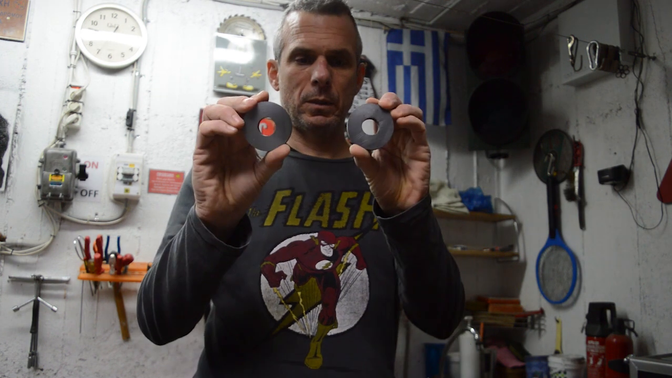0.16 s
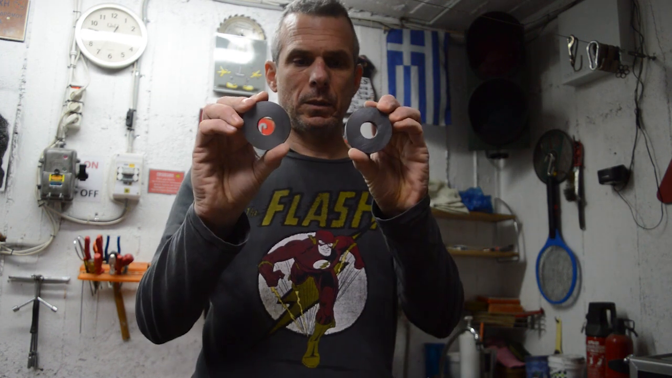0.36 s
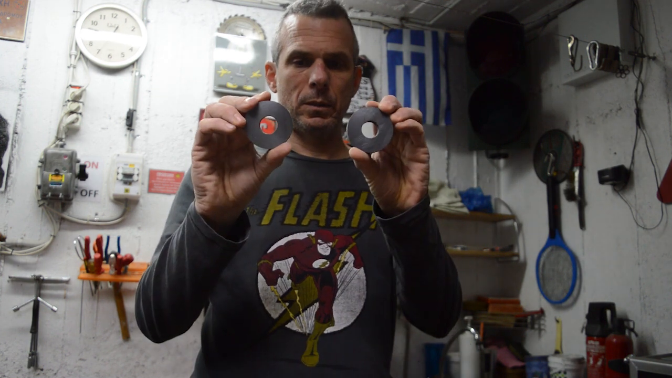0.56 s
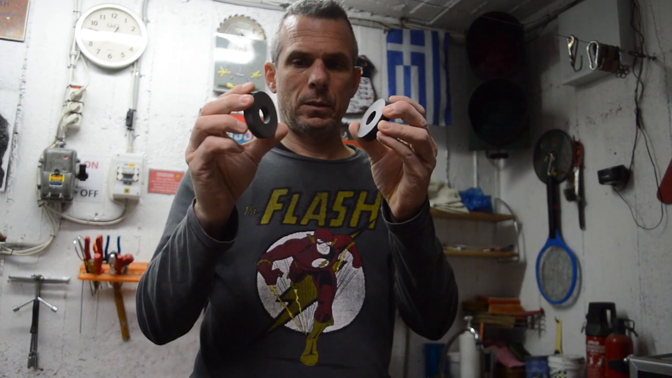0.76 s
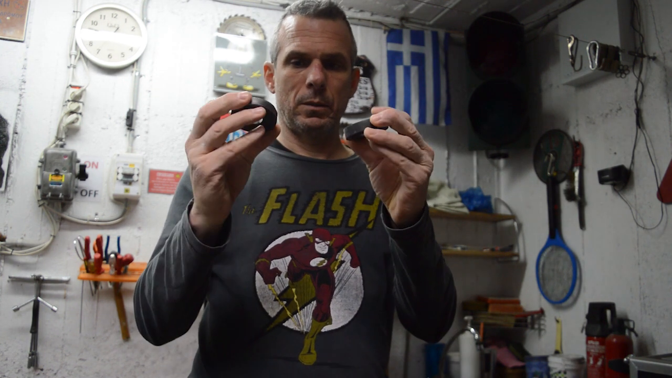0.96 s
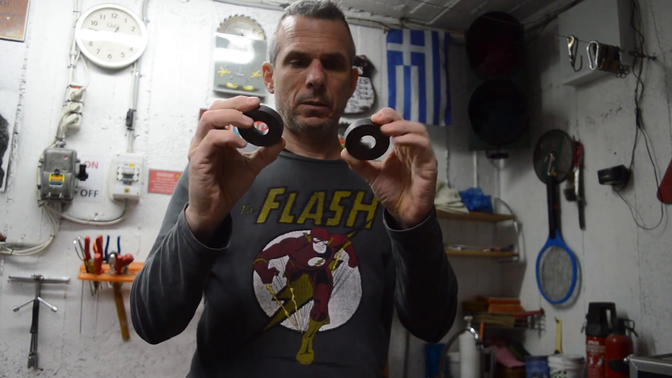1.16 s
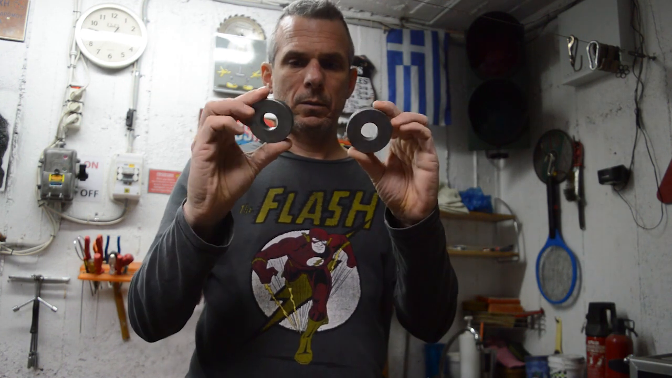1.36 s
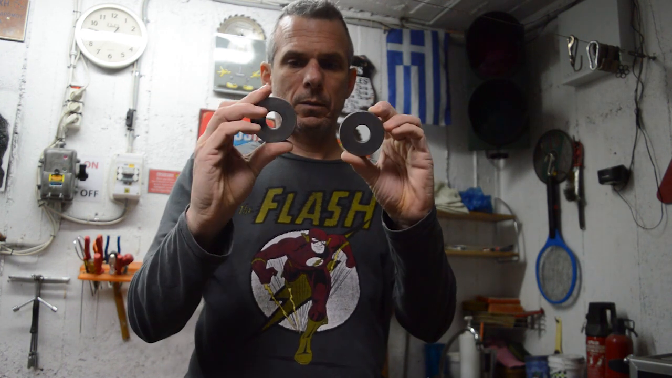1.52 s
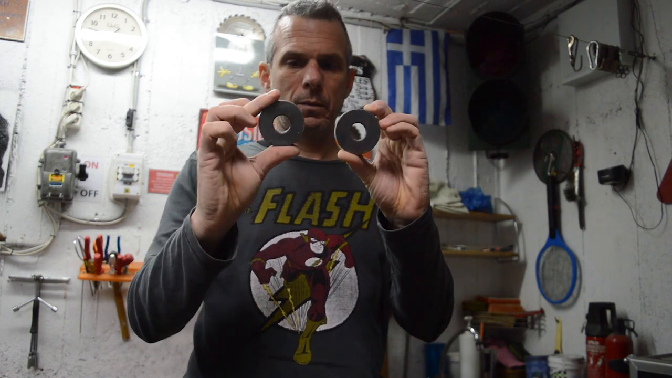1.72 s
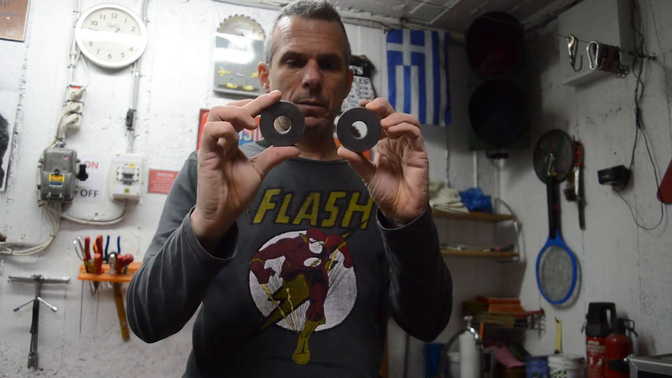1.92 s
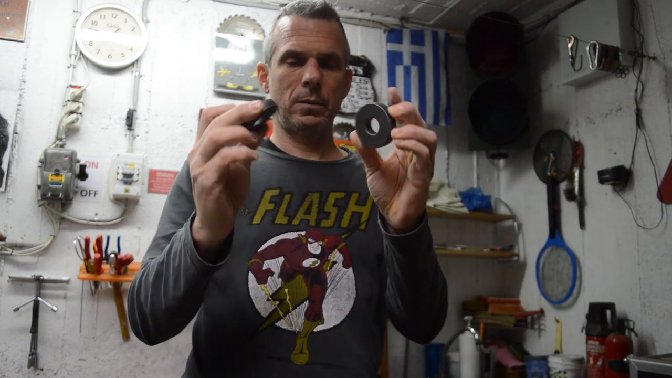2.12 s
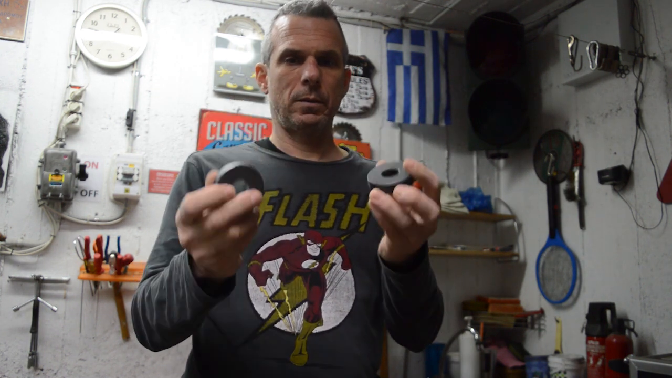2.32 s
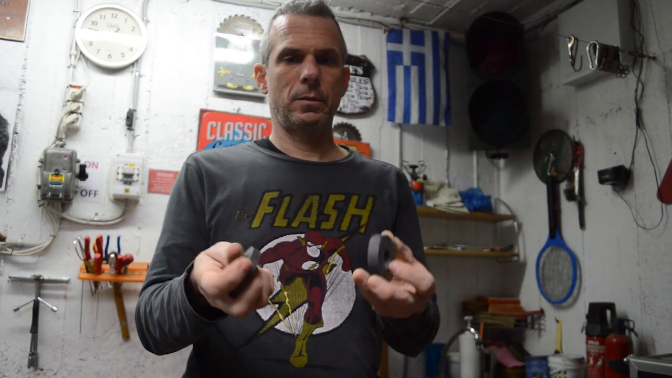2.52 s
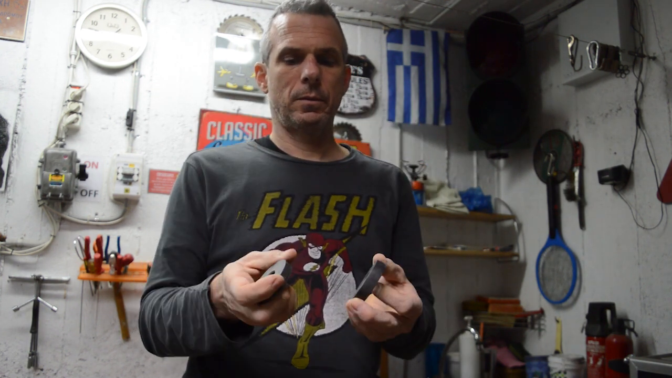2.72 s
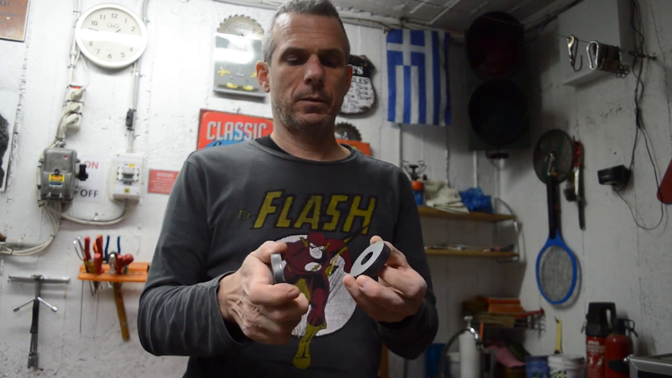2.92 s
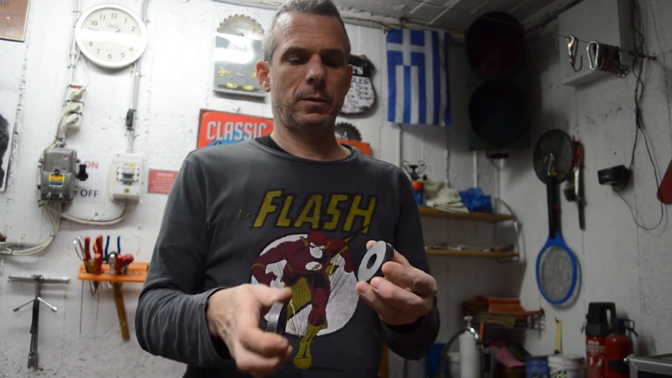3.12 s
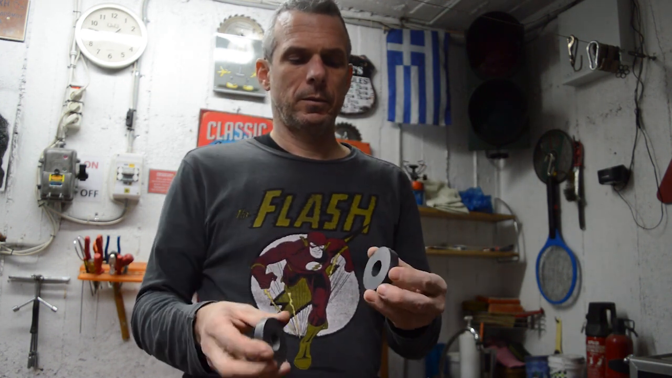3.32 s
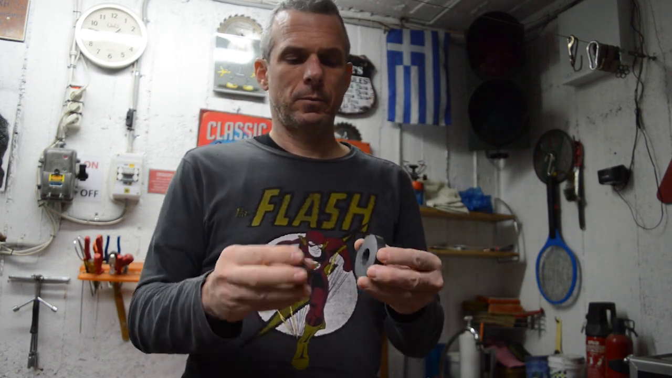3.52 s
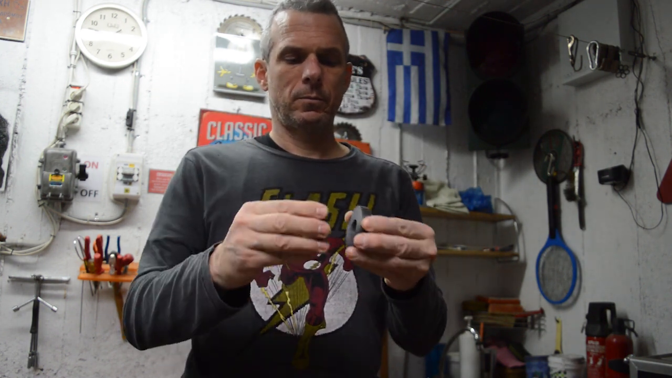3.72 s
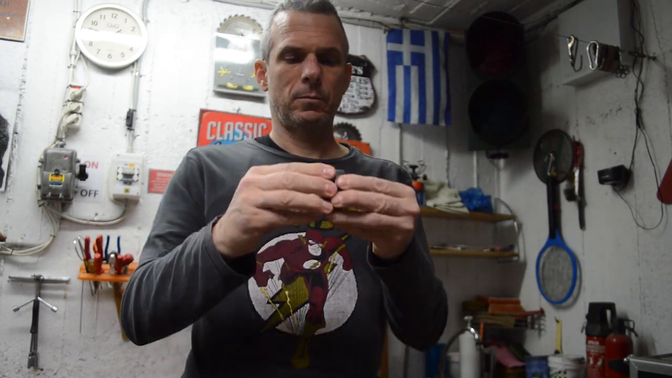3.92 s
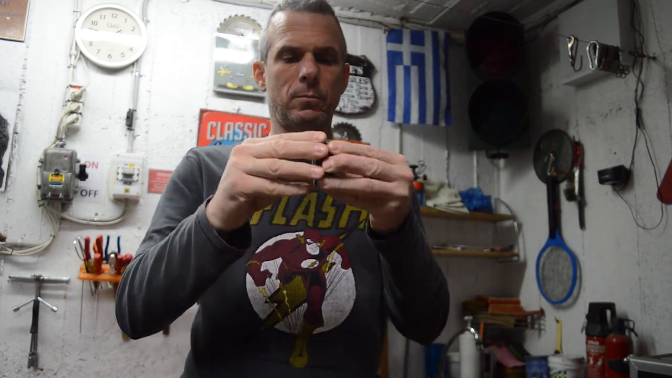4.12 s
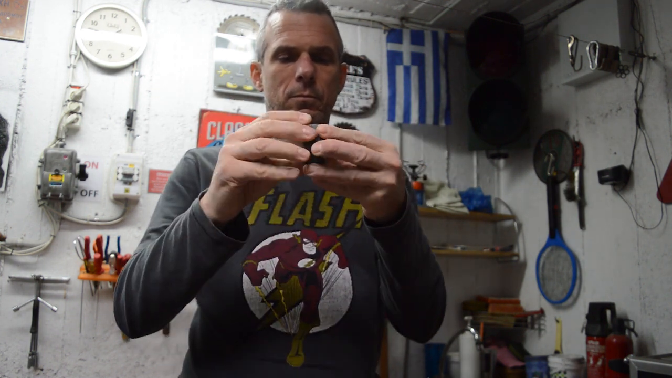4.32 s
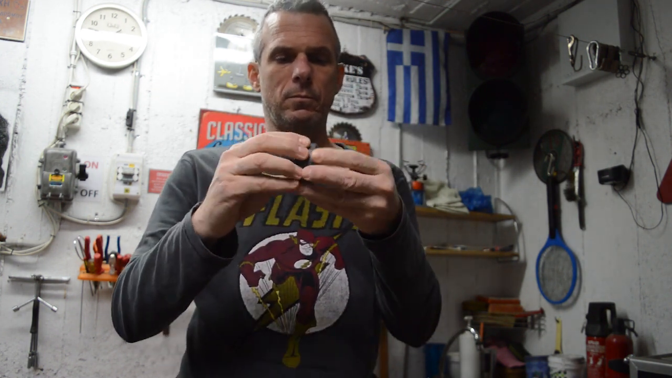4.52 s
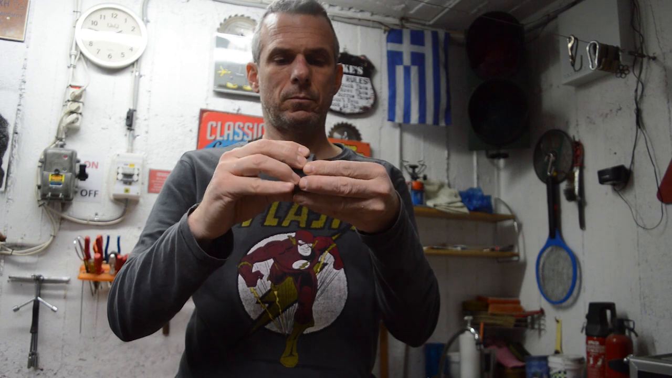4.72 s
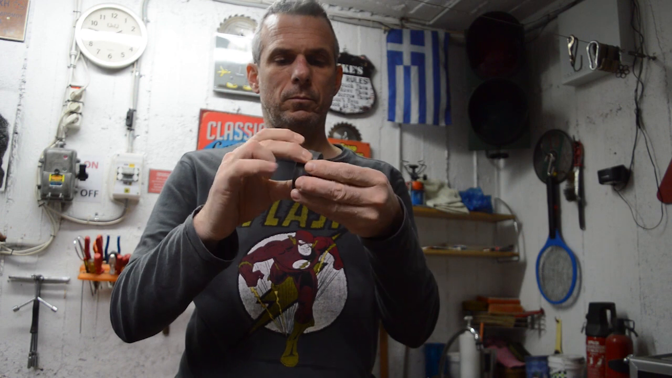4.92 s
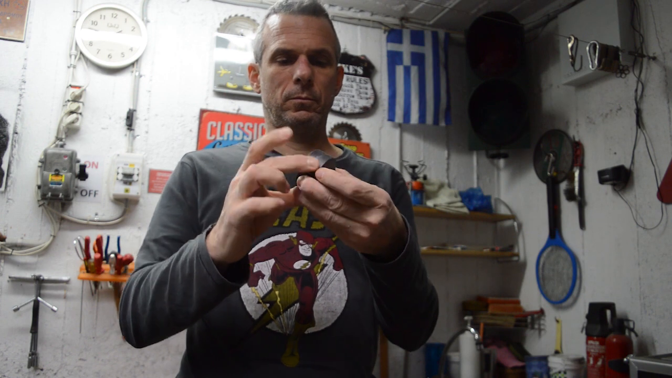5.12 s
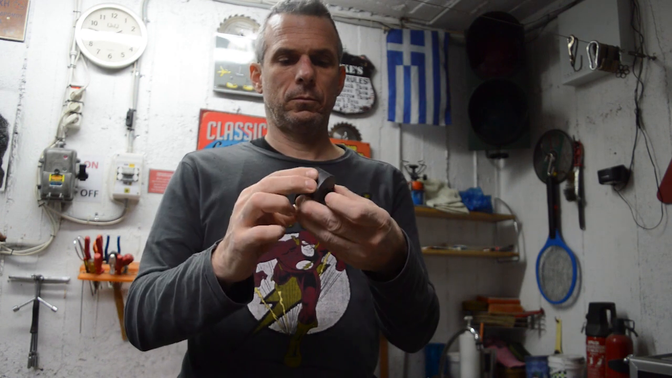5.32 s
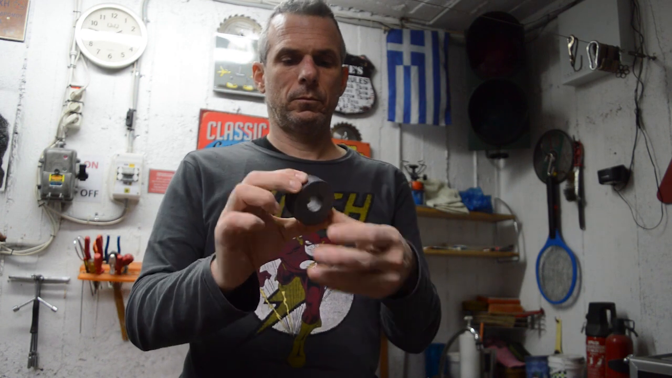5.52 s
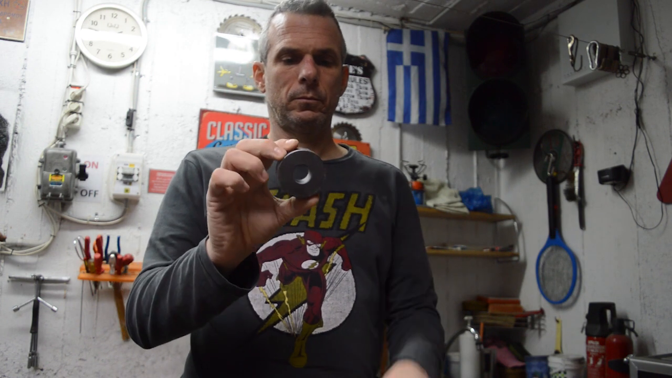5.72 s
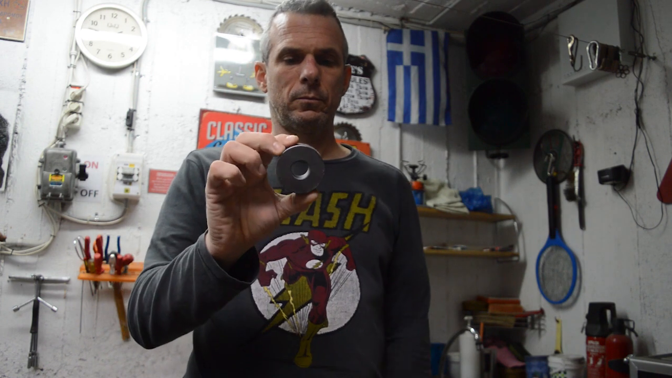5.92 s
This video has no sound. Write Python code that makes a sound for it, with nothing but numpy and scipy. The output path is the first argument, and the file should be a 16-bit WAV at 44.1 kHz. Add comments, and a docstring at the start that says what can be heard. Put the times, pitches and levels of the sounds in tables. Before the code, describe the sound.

A small, hard-walled workshop with steady soft hiss, a faint whirr and a clock's dull plastic rattle each second from about 0.7 s, alternately weaker and stronger. Fingers turn two ferrite rings: thin, gritty, high-pitched rubbing and brief slips, most noticeable around 0.7, 1.1 and 2.3 to 2.6 s, with tiny taps at 0.4 and 2.7 s. A distant engine hum wavers in from about 2 s, is strongest near 3.5 to 3.8 s, then recedes. At 3.95 s the magnets snap together in an abrupt, very loud, bright clack, clipped at the microphone, with dense high ringing that dies within a tenth of a second and short room reflections. At 4.16 s comes a dry, extremely short click. Light taps follow at 4.4, 4.6 and 5.5 s, with soft finger slips near 4.9 s, while ticking and room tone continue to about 6 s.

```python
"""A small hard-walled workshop: two ferrite ring magnets, turned in the fingers, snap together.
The clack, noise cracks over decaying ring modes, overloads the microphone; a dry click follows as they settle flat.
Fingertips slip on the ferrite as gritty filtered noise, with light taps of nails and rims.
A wall clock steps once a second in short noise rattles; a far engine hums in harmonics under hissing room tone."""
import sys
import numpy as np
from scipy import signal
from scipy.fft import rfft, irfft, next_fast_len
from scipy.io import wavfile

SR = 44100
rng = np.random.default_rng(int(sys.argv[2]) if len(sys.argv) > 2 else 0)


def master_out(mix):
    """Clip the mix to full scale and print it as 16-bit PCM to the path in sys.argv[1]."""
    frames = np.transpose(np.atleast_2d(mix))
    ceiling = np.clip(frames, -1, 1)
    pcm = np.round(ceiling * 32767).astype(np.int16)
    wavfile.write(sys.argv[1], SR, pcm)


N = 267113
TIME = np.arange(N) / SR  # [s]

# Ring against ring: (time [s], crack [dB], contact decay time [s], ringing [dB], thud [dB],
# share sent into the room [dB])
RING_IMPACTS = [(3.945, -6, 0.0016, 1, -25, -2), (4.1541, -30, .001, -48, -16, -15),
                (4.156, 4, 0.000083, -29, -9.5, -4.5)]
# Strongest modes of the struck rings, damped by the fingers: (frequency [Hz], level [dB], t60 [s])
RING_MODES = [(3008, -33.5, 0.061), (3897, -22.5, .06), (4310, -17.5, 0.042), (4600, -19.5, 0.062),
              (5370, -17, .05), (6100, -18, .07), (6456, -15, 0.051), (6730, -22, 0.078),
              (7146, -13, 0.049), (7675, -19, .05), (9600, -15, 0.11), (10260, -18, 0.0773),
              (10960, -11, 0.044), (11390, -12, .05), (11445, -16, .04), (12400, -9, .025),
              (12217, -9, 0.046), (12390, -8.5, 0.024)]
# The crowd of weaker, close-set ring modes: (frequency [Hz], relative level [dB])
WEAK_MODE_COLOUR = [(300, -48), (1200, -31), (1700, -21.5), (2400, -16), (3000, -5), (4200, -.5),
                    (5300, -2), (6600, 4.5), (7500, 1.5), (8600, -4.5), (10800, 2), (12550, 3.5),
                    (13100, -16.5), (16000, -30)]
# Colour of the contact crack: (frequency [Hz], relative level [dB])
CRACK_COLOUR = [(100, -32.5), (500, -20), (1000, -10.5), (1600, -16), (2300, -3.5), (3300, -6), (5000, 1),
                (7500, 0), (9800, 3.5), (11000, -4.5), (12200, -13.5), (13100, -8.5), (14000, -22),
                (16000, -18)]
# The pair rocking in the grip, a dead thud: (frequency [Hz], level [dB], t60 [s])
GRIP_THUD = [(990, -23, 0.0028), (2330, -19, .005), (3100, -24, 0.0064), (4100, -19, 0.0045)]


def magnets(chatter_db=-6, crowd_db=-5, crowd_t60=0.068, knock_db=-14, knock_time=0.00023, beam_hz=5000):
    """Each impact is a crack with a brief chatter of the faces, and sets the rings' modes going."""
    direct, radiated = np.zeros(N), np.zeros(N)
    t = np.arange(SR // 4) / SR
    # the many weaker modes overlap into a dense crash
    crash = coloured(rng.standard_normal(len(t)), WEAK_MODE_COLOUR)
    ring = modes(RING_MODES, t) + amp(crowd_db - 60 * t / crowd_t60) * crash
    # each clack carries a short low knock
    knock = amp(knock_db) * (1 - t / knock_time) * np.exp(-t / knock_time)
    crack_pulse = causal(CRACK_COLOUR)
    dulling = signal.butter(1, beam_hz, fs=SR)
    for s, crack_db, contact_s, ring_db, thud_db, room_db in RING_IMPACTS:
        force = amp(chatter_db) * rng.standard_normal(len(t)) * np.exp(-t / contact_s)
        force[0] = -1.6  # the first touch
        crack = amp(crack_db) * signal.fftconvolve(force, crack_pulse)[:len(t)]
        body = amp(ring_db) * ring + amp(thud_db) * modes(GRIP_THUD, t)
        add(direct, s, crack + body + amp(ring_db) * knock)
        # the crack's treble beams forward, so the walls get a duller one
        dull_crack = signal.lfilter(*dulling, crack)
        add(radiated, s, amp(room_db) * (dull_crack + body))
    return direct, radiated


# The rings are turned in the fingers: (start [s], fastest [s], end [s], level at the fastest [dB],
# centre frequency [Hz])
RING_TURNS = [(0.65, 1.194, 1.72, -57.5, 9700), (2.054, 2.495, 2.72, -54, 9660),
              (2.65, 2.887, 3.3, -62.5, 9300), (4.78, 4.878, 5.1, -57, 9900),
              (5.901, 6.056, 5.5, -52, 9100)]
# A fingertip lets go and slips: (middle [s], level [dB], centre frequency [Hz])
FINGER_SLIPS = [(0.11, -59, 10300), (0.692, -47, 10200), (1.054, -54, 9800), (1.128, -43.5, 10300),
                (1.3, -56, 10200), (1.468, -57, 9650), (2.145, -55, 10500), (2.314, -45, 9500),
                (2.416, -45, 9350), (2.55, -52, 10300), (2.625, -46.5, 10400), (3.112, -53.5, 9700),
                (4.877, -50, 9860), (4.976, -52.5, 10300)]


def fingers(uneven_db=3.5, uneven_hz=14, slip_half_s=0.032, slip_at_db=-51.5, slip_halving_db=9.5):
    """Rubbing follows each turn of the rings through a wavering grip; slips are short swells on top."""
    rubbing, slipping = np.zeros(N), np.zeros(N)
    for start, fastest, end, db, hz in RING_TURNS:
        t = start + TIME[:2 * SR]
        speed = np.interp(t, [start, fastest, end], [0, 1, 0])
        add(rubbing, start, amp(db) * speed * skin(t, hz))
    for middle, db, hz in FINGER_SLIPS:
        t = max(middle - .5, 0) + TIME[:SR]
        # a faster slip is louder and over sooner: its length halves with each slip_halving_db
        half_s = slip_half_s * 2 ** ((slip_at_db - db) / slip_halving_db)
        swell = 1 / np.cosh(2 * (t - middle) / half_s)
        add(slipping, t[0], amp(db) * skin(t, hz) * swell)
    grip = amp(uneven_db * drift(uneven_hz))
    return rubbing * grip + slipping


# Colour of skin on ferrite: (frequency as a factor on its centre [ratio], relative level [dB])
SKIN_COLOUR = [(.2, -29), (.45, -14), (.7, -7.5), (.9, -2.5), (1.05, 2.5), (1.25, -5), (1.6, -13.5)]


def skin(t, centre_hz, grain_db=3):
    """Skin catching on the grainy ferrite: a fine, gritty hiss of rms 1."""
    white, grit = rng.standard_normal((2, len(t)))
    grains = grit[np.arange(len(t)) // 20]  # each grain lasts 20 samples
    return coloured(white * amp(grain_db * grains), SKIN_COLOUR, centre_hz)


# Light taps of nails and rims: (time [s], level at the onset [dB], centre frequency [Hz])
LIGHT_TAPS = [(0.404, -46.5, 2600), (2.7412, -46.5, 9000), (4.396, -51, 5970), (4.586, -45.5, 6620),
              (5.5, -47.5, 7980)]
# Colour of a tap: (frequency as a factor on its centre [ratio], relative level [dB])
TAP_COLOUR = [(.15, -26), (.5, -6), (.8, 1), (1.1, 0), (1.6, -6), (3, -20)]


def taps(decay_s=0.0047):
    """Tiny dead contacts, each a decaying noise in one broad band."""
    out, t = np.zeros(N), np.arange(SR // 20) / SR
    for s, db, hz in LIGHT_TAPS:
        noise = coloured(rng.standard_normal(len(t)), TAP_COLOUR, hz)
        add(out, s, amp(db) * noise * np.exp(-t / decay_s))
    return out


# Colour of the clock's plastic case: (frequency [Hz], relative level [dB])
CLOCK_COLOUR = [(200, -17), (600, -5), (1200, -1), (1900, -2.5), (2600, -7.5), (3500, -9), (5000, -18),
                (12000, -26.5)]


def clock(first_s=0.686, step_s=1, weak_db=-53.5, strong_extra_db=2.5, rise_s=0.0035, rattle_s=0.047):
    """At each step, weak and strong in turn, the gears rattle briefly in the plastic case."""
    out, t = np.zeros(N), np.arange(SR // 4) / SR
    shape = (1 - np.exp(-t / rise_s)) * np.exp(-(t / rattle_s) ** 4)
    for k, s in enumerate(np.arange(first_s, N / SR, step_s)):
        rattle = shape * coloured(rng.standard_normal(len(t)), CLOCK_COLOUR)
        add(out, s, amp(weak_db + strong_extra_db * (k % 2)) * rattle)
    return out


# Near surfaces of the workshop: (delay [s], level [dB])
REFLECTIONS = [(.0026, -8.5), (.0047, -15), (.0099, -16.5), (0.0099, -19), (0.0166, -16.5)]
# How long the room rings: (frequency [Hz], t60 [s])
ROOM_DECAY = [(200, .3), (1300, 0.29), (3500, 0.29), (7000, 0.29), (10000, 0.23), (12500, 0.16),
              (16000, 0.22)]


def workshop(x, tail_db=-2, first_s=0.0052, build_s=0.00318):
    """What the room gives back: a few hard reflections, and a short diffuse tail decaying band by band."""
    hz, t, spectrum = signal.stft(rng.standard_normal(SR // 2), SR, nperseg=256)
    decay = amp(-60 * t / read(ROOM_DECAY, hz)[:, None])
    tail = signal.istft(spectrum * decay, SR, nperseg=256)[1]
    since_first = np.maximum(np.arange(len(tail)) / SR - first_s, 0)
    tail *= 1 - np.exp(-since_first / build_s)
    response = amp(tail_db) * tail / np.linalg.norm(tail)
    for delay, db in REFLECTIONS:
        add(response, delay, amp([db]))
    return signal.fftconvolve(x, response)[:N]


# Far engine: (time [s], mean firing rate [Hz], level of the hum [dB])
ENGINE_COURSE = [(0, 55, -88), (2, 55.92, -64), (2.8, 54.65, -62), (3.15, 55.74, -63), (3.5, 59.2, -57),
                 (3.8, 59.77, -57.5), (4.4, 59.2, -67), (5, 57.86, -77), (6.06, 58.15, -70)]
# Harmonics of the firing rate: (multiple [ratio], mean relative level [dB])
ENGINE_HARMONICS = [(2, -8.5), (3, -3.5), (4, -7.5), (5, -3.5), (6, 1), (7, -4.5), (9, -5.5), (11, -5),
                    (13, -5)]


def engine(waver=.012, waver_hz=24.8, flutter_db=4, flutter_hz=12,
           rumble_db=-5, rumble_hz=125, rumble_width_hz=90):
    """Low engine orders come through the wall, each fading in and out, over a rumble."""
    s, rate, db = np.transpose(ENGINE_COURSE)
    firing_hz = np.interp(TIME, s, rate) * (1 + waver * drift(waver_hz))
    cycles = np.cumsum(firing_hz) / SR
    hum = np.zeros(N)
    for multiple, level in ENGINE_HARMONICS:
        hum += amp(level + flutter_db * drift(flutter_hz)) * np.sin(2 * np.pi * multiple * cycles)
    rumble = rng.standard_normal(N)
    for _ in range(2):
        rumble = resonate(rumble, rumble_hz, rumble_width_hz)
    return amp(np.interp(TIME, s, db)) * (unit(hum) + amp(rumble_db) * unit(rumble))


# Room tone and microphone hiss: (frequency [Hz], relative level [dB])
AIR_COLOUR = [(20, -9.5), (40, -5), (75, 3.5), (110, 0), (160, -1), (300, -1.5), (600, -2.5), (1100, -4),
              (1500, -6.5), (2400, -7.5), (3500, -11.5), (7000, -14.5), (11000, -14.5), (16000, -20)]
# A faint steady whirr: (frequency [Hz], width [Hz], level [dB])
WHIRR_BANDS = [(765, 45, -63.5), (889, 67, -65.5), (2497, 42, -71)]


def room_tone(air_db=-55):
    """Steady air and hiss as coloured noise, with a few narrow whirring bands."""
    tone = amp(air_db) * coloured(rng.standard_normal(N), AIR_COLOUR)
    for hz, width_hz, db in WHIRR_BANDS:
        tone += amp(db) * unit(resonate(rng.standard_normal(N), hz, width_hz))
    return tone


def amp(db):
    """Decibels to gain."""
    return 10 ** (np.asarray(db) / 20)


def unit(x):
    """Scales to rms 1."""
    return x / np.sqrt(np.mean(x ** 2) + 1e-20)


def read(points, hz):
    """Reads a table on a log-frequency axis."""
    f, value = np.transpose(points)
    return np.interp(np.log(hz + 1e-6), np.log(f), value)


def add(mix, s, sound):
    """Mixes a sound in at s seconds."""
    part = mix[max(round(s * SR), 0):][:len(sound)]
    part += sound[:len(part)]


def coloured(x, points, centre_hz=1):
    """Gives a signal the spectrum of a table, at rms 1."""
    size = next_fast_len(len(x), real=True)
    hz = np.fft.rfftfreq(size, 1 / SR)
    gain = amp(read(points, hz / centre_hz))
    return unit(irfft(rfft(x, size) * gain, size)[:len(x)])


def causal(points, size=1024):
    """The shortest one-sided (minimum-phase) pulse with this spectrum, energy 1."""
    hz = abs(np.fft.fftfreq(size, 1 / SR))
    log_gain = np.log(amp(read(points, hz)))
    pulse = np.fft.ifft(np.exp(np.conj(signal.hilbert(log_gain)))).real
    return pulse / np.linalg.norm(pulse)


def modes(table, t):
    """A struck body: dying sines, neighbours in opposite sign."""
    out = np.zeros(len(t))
    for k, (hz, db, t60) in enumerate(table):
        out += (-1) ** k * amp(db - 60 * t / t60) * np.sin(2 * np.pi * hz * t)
    return out


def resonate(x, hz, width_hz):
    """One resonance, as a single complex pole."""
    r = np.exp(-np.pi * width_hz / SR)
    return signal.lfilter([1 - r], [1, -r * np.exp(2j * np.pi * hz / SR)], x).real


def drift(rate_hz, size=2048):
    """Slow random wandering of rms 1, fading out above rate_hz."""
    hz = np.fft.rfftfreq(size, N / SR / size)
    slow = irfft(rfft(rng.standard_normal(size)) * np.exp(-(hz / rate_hz) ** 2))
    return unit(np.interp(TIME, np.linspace(0, N / SR, size), slow))


def scene(hands_room_db=-11):
    """Magnets, hands and clock each reach the walls by their own paths, over the background."""
    direct, radiated = magnets()
    hands, ticking = fingers() + taps(), clock()
    room = workshop(radiated) + amp(hands_room_db) * workshop(hands) + workshop(ticking)
    return (direct + hands + ticking + room + engine() + room_tone())[None]


def record(dry, ceiling=0.79, low_cut_hz=22, edge_hz=15850):
    """The microphone input clips on the clack; then the low cut and the band limit."""
    clipped = np.clip(dry, -ceiling, ceiling)
    cut = signal.lfilter(*signal.butter(1, low_cut_hz, "highpass", fs=SR), clipped)
    band_limit = signal.firwin(255, edge_hz, window=("kaiser", 8), fs=SR)
    return signal.oaconvolve(cut, band_limit[None], "same")


dry = scene()
out = record(dry)
master_out(out)
```